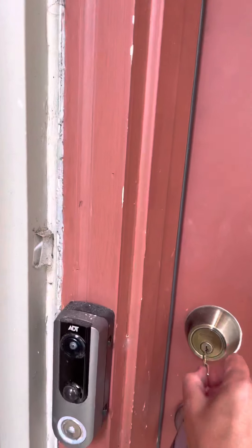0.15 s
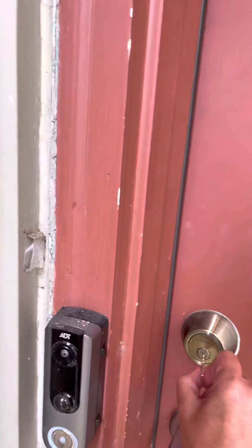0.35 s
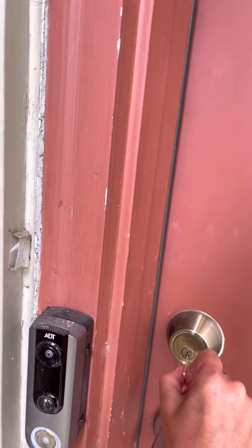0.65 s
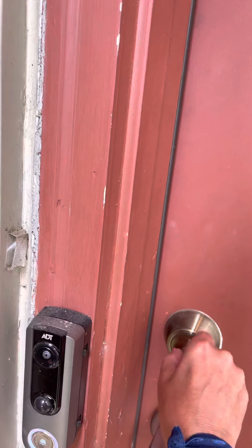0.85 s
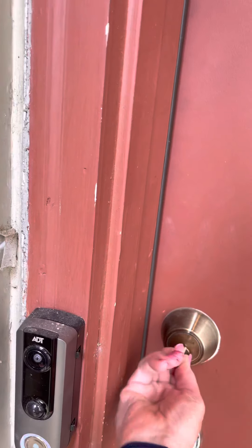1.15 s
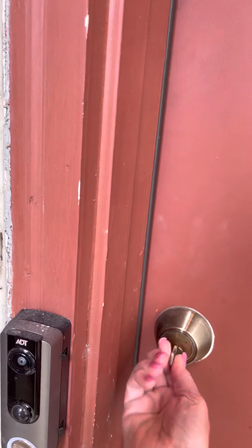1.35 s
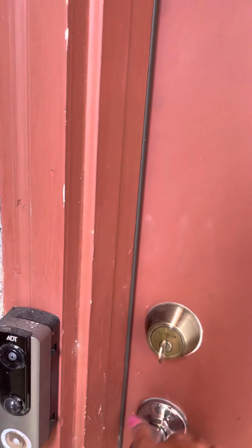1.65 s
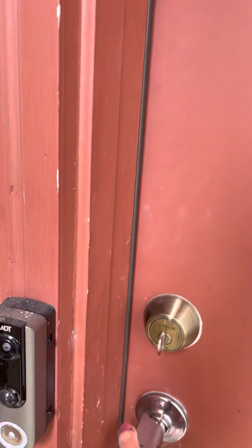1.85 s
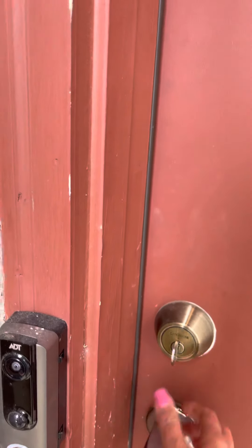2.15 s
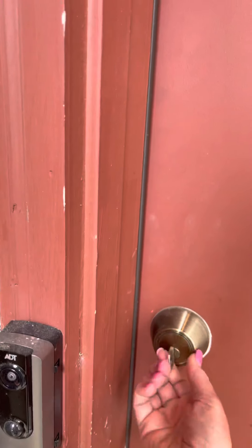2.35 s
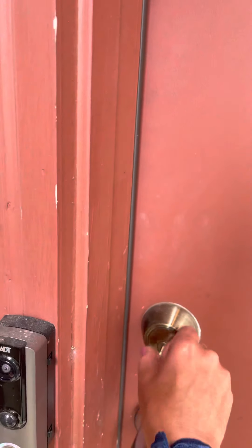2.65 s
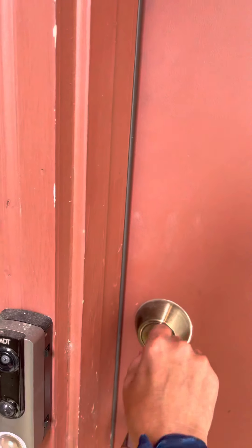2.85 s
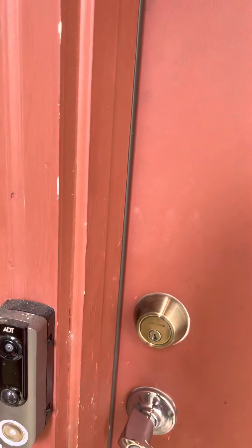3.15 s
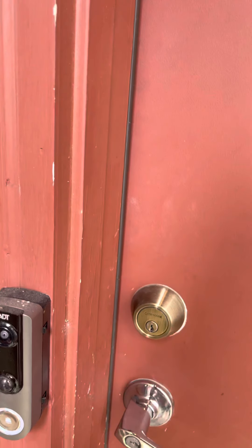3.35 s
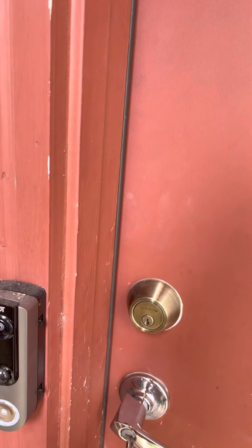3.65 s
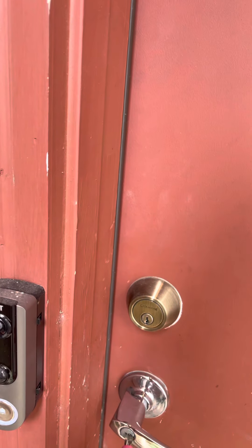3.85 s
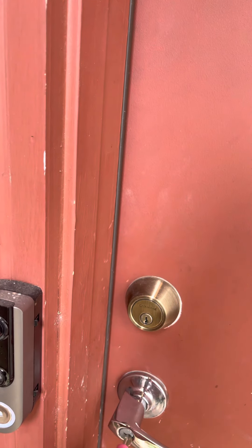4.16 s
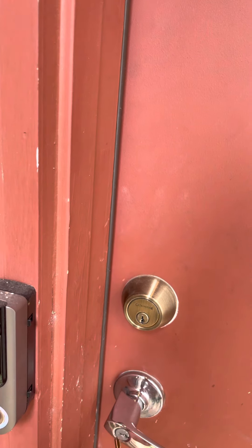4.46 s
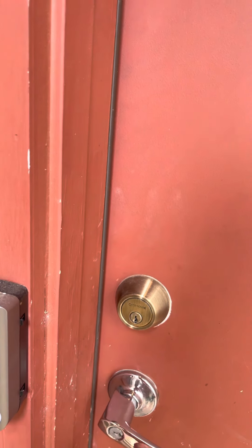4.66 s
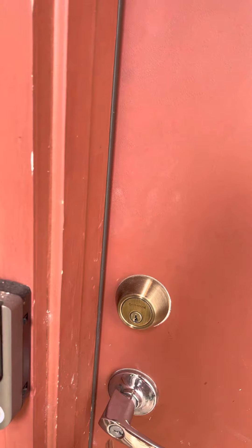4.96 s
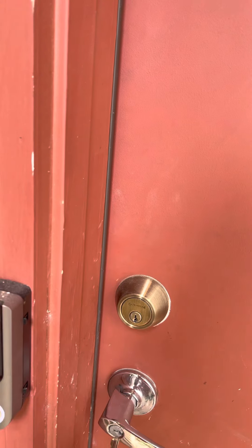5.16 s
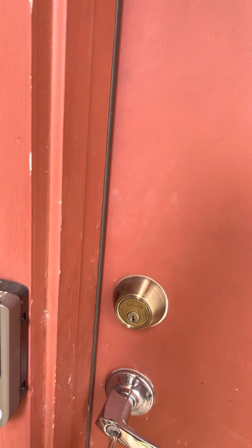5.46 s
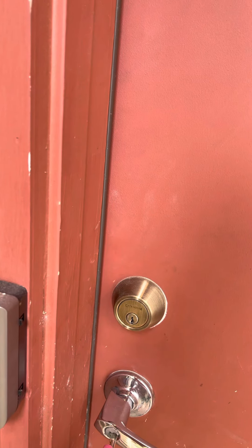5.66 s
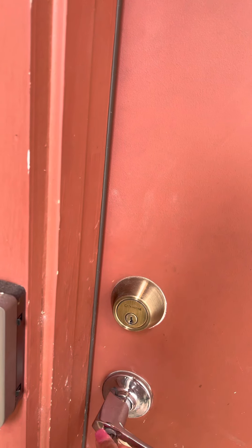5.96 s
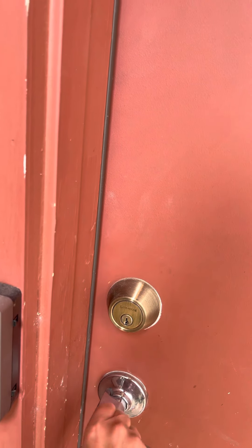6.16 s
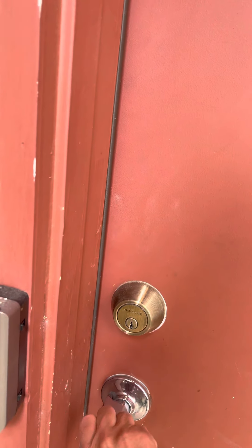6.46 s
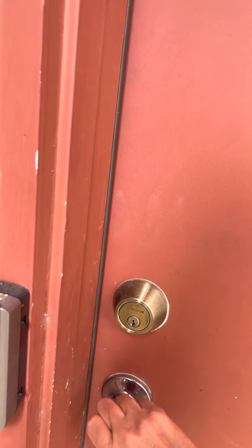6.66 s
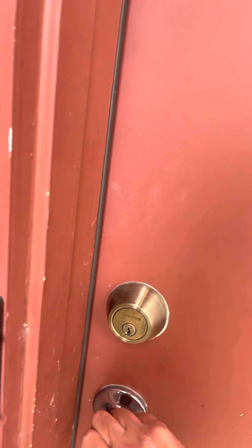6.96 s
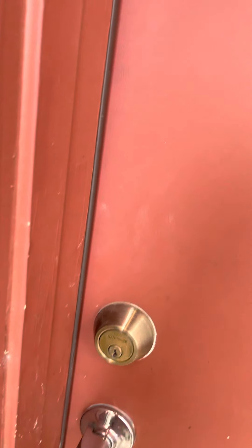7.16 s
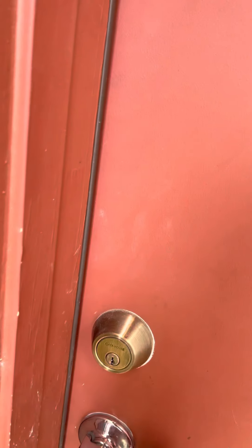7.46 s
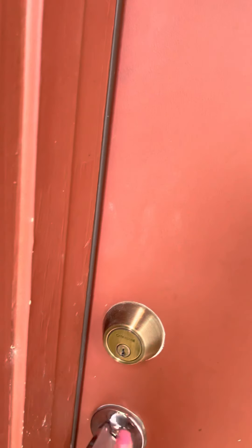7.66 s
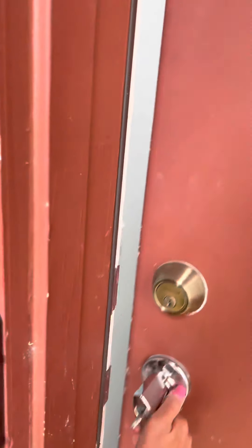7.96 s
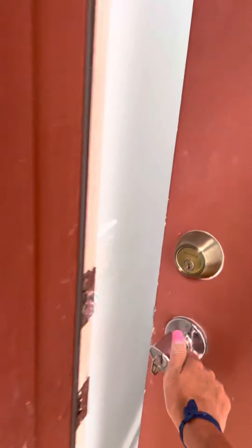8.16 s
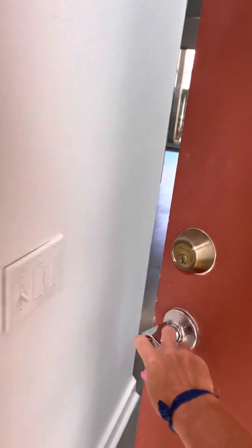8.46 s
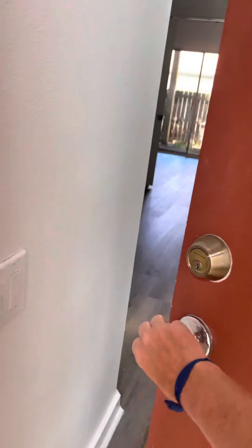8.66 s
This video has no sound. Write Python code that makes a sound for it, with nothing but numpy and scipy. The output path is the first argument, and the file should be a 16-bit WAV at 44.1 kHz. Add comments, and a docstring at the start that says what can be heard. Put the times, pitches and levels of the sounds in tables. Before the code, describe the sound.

Bright, dry clicks and scratchy strokes of small metal parts, very near, with soft panel thuds beneath. Busy key work in the lock comes first, then sparse faint ticks, then firmer handle knocks and a strong latch clack as the door swings open, with brief faint hinge squeaks. Behind it all lie steady bass-heavy street noise and a wavering distant engine hum; a thin high whine appears late. Stereo, close, outside an entrance.

```python
"""First a short metal scrape and a click, close at a wooden door, over street rumble and a far engine drone.
A hand turns a key in a deadbolt, draws it out, unlocks the knob below and pushes the door open.
Clicks and scrapes are noise that rings the lock; thumps shake the panel modes; faint squeaks are slipping tones.
Street and drone are shaped noise and wavering tones. Two close microphone ports hear the treble out of step."""
import sys
import numpy as np
from scipy import signal
from scipy.fft import rfft, irfft, next_fast_len
from scipy.io import wavfile
from scipy.ndimage import uniform_filter1d

SR = 44100
rng = np.random.default_rng(int(sys.argv[2]) if len(sys.argv) > 2 else 0)


def waveform_to_disk(signal):
    """Save audio, clipped to [-1, 1], as 16-bit WAV at the path in sys.argv[1]."""
    frames = np.transpose(np.atleast_2d(signal))
    scaled = np.clip(frames, -1, 1) * 32767
    samples = np.round(scaled).astype(np.int16)
    wavfile.write(sys.argv[1], SR, samples)


N = 388521


def gain_of(db):
    """Turns decibels into an amplitude factor."""
    return 10 ** (np.asarray(db) / 20)


def evened(x):
    """Brings each row to an rms of 1."""
    return x / np.sqrt(np.mean(x ** 2, -1, keepdims=True) + 1e-20)


def read(points, hz):
    """Reads a curve of (f/Hz, value) points along a logarithmic frequency axis."""
    f, value = np.transpose(points)
    return np.interp(np.log(hz + 1), np.log(f + 1), value)


def smoothed_twice(x, size):
    """Runs a moving average twice along the last axis."""
    return uniform_filter1d(uniform_filter1d(x, size=size), size=size)


def add(mix, start_s, sound):
    """Lays a sound into the mix at its start time, cut at the end of the scene."""
    part = mix[:, round(start_s * SR):][:, :sound.shape[1]]
    part += sound[:, :part.shape[1]]


def resonate(x, hz, width_hz):
    """Shifts the curve hz down to zero, smooths, and shifts back: a resonance of gain 1."""
    turn = np.exp(2j * np.pi * np.cumsum(hz * np.ones(x.shape[-1])) / SR)
    pole = np.exp(-np.pi * width_hz / SR)
    smooth = signal.lfilter([1 - pole], [1, -pole], x / turn + 1e-18)
    return 2 * (turn * smooth).real


def halo_around(noise, hz, width_hz):
    """Narrows noise to a fuzzy halo around hz by two resonances in a row, at rms 1."""
    return evened(resonate(resonate(noise, hz, width_hz), hz, width_hz))


# Spectrum of the street at the door; only its shape counts: f/Hz, level/dB (per Hz)
STREET_SPECTRUM = [(15, -84), (33, -29.5), (43, -6), (102, -5), (125, -12.5), (185, -14), (281, -26),
                   (330, -31.5), (1200, -35.5), (1520, -47), (2250, -47), (8000, -67), (11000, -65),
                   (13000, -100.5)]


def street():
    """Street rumble: random short-time spectra whose level drifts in patches of time and frequency."""
    level_db, patch_db = -33.5, 1.35  # overall rms; spread of the patches
    frames, hz = N // 512 + 5, np.fft.rfftfreq(2048, 1 / SR)
    a, b, c, d, patches = rng.standard_normal((frames, 1025, 5)).T
    patches = uniform_filter1d(patches, 20, 0)  # along frequency
    patches = evened(uniform_filter1d(patches, 12, 1))  # along time
    spectrum_db = read(STREET_SPECTRUM, hz)[:, None] + patch_db * patches
    spectra = np.array([a + 1j * b, c + 1j * d]) * gain_of(spectrum_db)
    sound = signal.istft(spectra, nperseg=2048, noverlap=1536)[1][:, :N]
    return gain_of(level_db) * evened(sound)


# Orders of the far engine, one list each, silent outside its times:
# t/s, f/Hz, level/dB (before the shares of tone and halo)
ENGINE_ORDERS = [
    [(0, 54.82, -35), (8.81, 56.38, -33.5)],
    [(0, 102.3, -31.5), (1.7, 106.9, -33.5), (1.95, 100.2, -30), (5.4, 97.38, -38.5), (5.7, 88.95, -34.5),
     (8.1, 89.8, -32), (8.3, 103.1, -42), (8.81, 106.4, -28)],
    [(5.3, 180.4, -43.5), (7.5, 176.6, -43.5)],
]


def drone(rows, steady=.65, width_hz=8.0):
    """One engine order or whistle: a gliding tone with a wavering halo of narrow noise."""
    s, hz, db = np.transpose(rows)
    t = np.arange(N) / SR
    hz = np.interp(t, s, hz)
    halo = halo_around(rng.standard_normal(N), hz, width_hz)
    tone = np.sqrt(2) * np.sin(2 * np.pi * np.cumsum(hz) / SR)
    level = gain_of(np.interp(t, s, db, -120, -120))
    return level * (steady * tone + 0.5 * halo)


# Colour of small metal parts as the close microphone hears them, with its peak near 11 kHz;
# each band is levelled afterwards: f/Hz, level/dB (per Hz)
METAL_COLOUR = [(500, -7.5), (1000, -12), (2500, -6.5), (4000, -5.5), (6500, -4.5), (8500, -8.5),
                (10000, 0.5), (11000, 1), (12000, -10), (12800, -21), (16000, -46)]


def metal_bands(x, body_db, fizz_db):
    """Colours x as small metal parts sound through the close microphone; weighs body, middle and fizz apart."""
    size = next_fast_len(x.shape[1] + 512)
    hz = np.fft.rfftfreq(size, 1 / SR)
    spectrum = rfft(x, size) * gain_of(read(METAL_COLOUR, hz))
    above_3k, above_9k = [1 / (1 + (edge / (hz + 1)) ** 12) for edge in (3000, 9000)]
    shares = (1 - above_3k, above_3k - above_9k, above_9k)
    bands = [irfft(spectrum * share, size)[:, :x.shape[1]] for share in shares]
    return sum(gain_of(db) * evened(band) for db, band in zip((body_db, 0, fizz_db), bands))


# Ringing modes of the lock: f/Hz, level/dB (relative),
# decay t/s (to fall 90 dB under a click, 120 dB under a scrape)
LOCK_MODES = [(820, -3, .1), (1050, -3, .07), (1290, 0, .1), (1500, 0, .08), (1880, -1, .045),
              (2370, -6, .05), (2800, -5, .05), (3500, -3, .06), (3950, -1, .06), (5500, -5, .05),
              (6500, -3, .05), (10800, -5, .07), (11090, -4, .07)]


def catch_ring(catches):
    """Each mode of the lock is rung briefly by a chance 40 % of the catches."""
    t = np.arange(round(.05 * SR)) / SR
    ring = 0
    for hz, db, decay_s in LOCK_MODES:
        mode = gain_of(db - 120 * t / decay_s) * np.exp(2j * np.pi * hz * t)
        struck = catches * (rng.random(len(catches)) < .4)
        ring = ring + signal.oaconvolve(struck, mode)[:len(catches)]
    return evened(np.array([ring.imag, ring.real]))


# Strokes of metal sliding on metal, close: start t/s, rise t/s, fall t/s,
# top level/dB (3-9 kHz), fizz level/dB re that, lock body level/dB re that
SCRAPES = [(0, 0.00038, 0.095, -36, 4, 3.5), (0.696, 0.082, 0.084, -29.5, -3, 1.5),
           (0.819, 0.051, 0.39, -56, -2.5, 5), (1.3, 0.25, .03, -63, -6, 6),
           (2.378, 0.024, 1, -64, -6, 10.5), (2.761, 0.052, 0.23, -50.5, -9.5, 11),
           (4.049, 0.14, 0.13, -58.5, -13.5, -12.5), (5.675, 0.099, 0.099, -43, 8, -2),
           (5.85, 0.19, 0.16, -57, -5, -1), (6.658, 0.071, 0.21, -48.5, -6, 4.5),
           (6.799, 0.1, 0.25, -52.5, 3.5, 1.5), (7.559, 0.058, 0.27, -42, -0.5, -0.5),
           (7.7, 0.056, 0.31, -38, -1.5, 2.5), (7.85, 0.32, 0.23, -52.5, -0.5, 6),
           (8.2, 0.063, 0.8, -58.5, -2, 1)]


def scrape(rise, fall, top_db, fizz_db, body_db):
    """Dense tiny catches, a few of them larger, blur into a rustle that swells and fades with the stroke."""
    ends_db, bend = -23, 1.01  # level at either end of a stroke re its top; above 1 = a rounded top
    catches_per_s, ring_db = 450, -8.5  # ring of the lock re the rustle
    t = np.arange(round(.8 * SR)) / SR
    away = np.where(t < rise, 1 - t / rise, (t - rise) / fall)  # 0 at the top, 1 at either end
    stroke = gain_of(top_db + ends_db * away ** bend)
    sizes = gain_of(3.0 * np.minimum(rng.exponential(1, len(t)), 2.5))
    catches = sizes * (rng.random(len(t)) < catches_per_s / SR)
    blurred = signal.lfilter([1], [1, -np.exp(-1 / (.002 * SR))], catches)  # each fades over 2 ms
    grain = .8 + uniform_filter1d(blurred, size=20)
    rustle = rng.standard_normal((2, len(t))) * evened(grain)
    rasp = rustle + gain_of(ring_db) * catch_ring(catches)
    return stroke * metal_bands(rasp, body_db, fizz_db)


def tinted(x):
    """Lays chance hills and valleys over the spectrum: each contact sounds from another spot."""
    spread_db, width_hz = 3.0, 600
    size = x.shape[1]
    hills = evened(smoothed_twice(rng.standard_normal(size // 2 + 1), width_hz * size // SR))
    return irfft(rfft(x) * gain_of(spread_db * hills), size)


# Clicks of key, pins and latch, close: t/s, rms level/dB (3-9 kHz),
# lock body level/dB re that, fizz level/dB re that, strongest ring f/Hz
CLICKS = [(0.004, -52, 6, 2, 820), (0.185, -49.5, 0.5, 10.5, 2800), (0.364, -66.5, -24, 12.5, 1290),
          (0.4557, -43, 1, -8.5, 1640), (0.5026, -51.5, 5.5, 7, 1560), (0.7674, -37.5, -2, -3, 1260),
          (0.7996, -49.5, 8, -14, 1500), (0.95, -58, 6.5, -5, 1900), (1.0119, -54, 0.5, -6, 2340),
          (1.3605, -66, 11.5, -11.5, 2450), (1.463, -63, 4.5, -32, 1500), (1.513, -52.5, -2.5, 5, 4030),
          (1.71, -55, -5, -0.5, 4450), (1.7872, -66, 5, -2, 1263), (2.1365, -44.5, -45, -1.5, 6500),
          (2.32, -64, -2, 12.5, 1290), (2.3424, -39.5, -2, -2.5, 4100), (2.4009, -48, -2.5, 1, 5560),
          (2.483, -70, 11.5, 1, 3500), (2.57, -75.5, 15, -12, 5400), (2.6187, -57.5, 8, -11, 1350),
          (2.699, -70, -20, -1, 6504), (2.715, -62.5, 11, -25, 1300), (2.7926, -48.5, 2, -3, 1700),
          (2.823, -53.5, 9.5, 2.5, 1506), (2.8572, -49.5, -16, 1.5, 1540), (2.8981, -42, 4.5, 14, 1330),
          (3.682, -80.5, -9, 9, 6500), (4.0162, -67, 6, 5, 1290), (4.335, -61.5, -6, -9, 2376),
          (4.43, -73, 9, -21.5, 2370), (4.8014, -77, -13, 12.5, 1290), (4.933, -60.5, -9, 8.5, 6500),
          (5.456, -75.5, -10, -3.5, 6500), (5.4764, -64.5, 1.5, 15.5, 1260), (5.7094, -64, -23, 17.5, 1290),
          (6.081, -64, 3.5, 7, 1880), (6.219, -68, -21.5, -2.5, 6500), (6.5333, -71, 12, -10, 1400),
          (6.672, -61.5, -23, 5, 2800), (6.7263, -44, -9, -3.5, 3600), (6.8582, -58, 9.5, -4, 1540),
          (6.885, -46, -1, 3, 6500), (7.218, -67.5, 2.5, -3, 1500), (7.6022, -51, -30, 6.5, 6545),
          (7.644, -55.5, -0.5, 5, 1484), (7.7489, -42.5, -5, 2, 2760), (7.7724, -49.5, 13, -17, 1880),
          (7.8256, -49, 3, 4, 1049), (7.889, -49.5, 6.5, -4, 1014), (8.09, -43, -0.5, -4, 1160),
          (8.1527, -57, -3, 0, 1298), (8.5218, -59.5, -33, -9, 6400), (8.75, -65, 6.5, 5, 2400)]


def click(level_rms_db, body_db, fizz_db, ring_hz):
    """A crack of a few milliseconds, the ring of the lock, and a noisy tail from the door recess."""
    t = np.arange(round(.22 * SR)) / SR
    hz, db, decay_s = np.transpose(LOCK_MODES)[:, :, None]
    chance = rng.standard_normal((3, len(LOCK_MODES), 1))
    near_db = 9.0 * np.exp(-(np.log(hz / ring_hz) / .15) ** 2)  # the part that is struck rings most
    level_db = db + near_db + 2.5 * chance[0]
    sagging_t = t * (1 - 1.2 * t)  # the ring sags as the parts settle
    turn = 2 * np.pi * hz * (1 + 0.03 * chance[1]) * sagging_t + 9 * chance[2]
    modes = (gain_of(level_db - 90 * t / decay_s) * np.exp(1j * turn)).sum(0)

    unevenness = evened(uniform_filter1d(rng.standard_normal(len(t)), size=120))
    clatter = gain_of(4.0 * unevenness)  # loose parts rebound unevenly
    crack = np.exp(-((t - .0015) / 0.0018) ** 2)
    rattle = clatter * gain_of(-7.5 - 60 * t / 0.14)
    tail = gain_of(-12.0 - 60 * t / 0.28)

    shake = rng.standard_normal(len(t)) * (crack + 2 * rattle)
    # crack and rebounds keep striking the modes
    ring = signal.oaconvolve(shake / np.linalg.norm(shake), modes)[:len(t)]
    noise = tinted(rng.standard_normal((2, len(t)))) * (crack + rattle + tail)
    blow = noise + gain_of(-10.0) * np.array([ring.imag, ring.real])
    blow = blow * np.minimum(t / 0.0012, 1) * (1 - t / t[-1])
    return gain_of(level_rms_db) * metal_bands(blow, body_db, fizz_db)


# Broad low modes of the wooden panel: f/Hz, level/dB (relative, before the struck spot is raised)
PANEL_MODES = [(260, 3), (310, 7), (440, 6), (520, 3), (640, 5), (770, 1)]
# Blows passed into the door panel: t/s, peak level/dB of the knock,
# boom level/dB re that (before its fade), decay t/s (60 dB, of the push), strongest mode f/Hz
THUMPS = [(0.452, -31.5, -2, 0.086, 452), (1.713, -30.5, 1, 0.11, 256), (1.787, -25, 1, 0.13, 294),
          (2.086, -27, -1.5, 0.24, 278), (2.396, -27, 3, 0.08, 454), (2.801, -28.5, 3, 0.14, 530),
          (2.855, -29, 16, 0.082, 303), (4.021, -28.5, -15, 0.12, 425.3), (5.754, -27, 0.5, 0.19, 395),
          (5.796, -28.5, 10.5, 0.087, 308), (6.034, -24.5, -3, 0.17, 414), (6.724, -14.5, 1.5, 0.12, 590),
          (6.859, -18, -3.5, 0.19, 544), (7.595, -21, 1, 0.23, 360), (7.645, -20.5, -10, 0.13, 468),
          (7.687, -22.5, 2.5, 0.21, 440), (7.75, -15, 0.5, 0.049, 308), (7.773, -11, -2.5, 0.049, 560),
          (7.837, -22, 4.5, 0.04, 785), (7.89, -29.5, -16, 0.1, 428), (8.115, -27.5, -1, 0.21, 269),
          (8.191, -22.5, -9, 0.13, 313), (8.265, -32, -9, 0.087, 655), (8.745, -36, -9, 0.05, 640)]


def thump(peak_db, boom_db, t60, mode_hz):
    """A push shakes the broad low modes of the panel, most those of the spot that is struck."""
    boom_hz = 136
    t = np.arange(2 ** 14) / SR
    f = np.fft.rfftfreq(len(t), 1 / SR)
    swell = gain_of(-60 * t / t60) * np.minimum(t / (0.091 * t60), 1)
    onset = 2.1 * np.exp(-t / 0.0019)
    push = rng.standard_normal((2, len(t))) * (swell + onset)
    panel = 0
    for hz, db in PANEL_MODES:
        near_db = 8.4 * np.exp(-(np.log(hz / mode_hz) / 0.22) ** 2)
        ratio = f / hz
        panel = panel + gain_of(db + near_db) / (1 - ratio ** 2 + .13j * ratio) * ratio
    softness = (1 + 1j * f * t60 / 23.0) ** 2  # longer blows are duller
    knock = irfft(rfft(push) * panel / softness)
    knock = knock / abs(knock).max(1, keepdims=True)
    boom = gain_of(boom_db - 60 * t / (1.94 * t60)) * np.sin(2 * np.pi * boom_hz * t)
    return gain_of(peak_db) * (knock + boom * np.minimum(t / 0.01, 1))


# Faint squeaks of hinge and handle: start t/s, end t/s, f/Hz (at the start, before slipping),
# level/dB (before the shares of tone and halo)
SQUEAKS = [(6.16, 6.40, 890, -56), (8.26, 8.305, 1335, -48), (8.36, 8.50, 1108, -56.5),
           (8.57, 8.64, 810, -52), (8.575, 8.625, 1620, -54), (8.63, 8.85, 528, -53)]


def squeak(length, hz, db):
    """An unevenly slipping, sinking tone with a fuzzy halo, fading in and out."""
    noise, t = rng.standard_normal((2, SR // 2)), np.arange(SR // 2) / SR
    halo = halo_around(noise, hz, width_hz=14)
    slip = evened(smoothed_twice(noise[0], 900))
    turn = 2 * np.pi * np.cumsum(hz * (1 - .06 * t + .008 * slip)) / SR
    tone = np.sqrt(2) * gain_of(2.5 * slip[::-1]) * np.sin(turn)
    fade = np.clip(4 * np.minimum(t, length - t) / length, 0, 1)
    return gain_of(db) * (.75 * tone + .6 * halo) * fade


# A thin high tone, perhaps an insect: t/s, f/Hz, level/dB (before the shares of tone and halo)
WHISTLE = [(6.25, 7320, -71.5), (6.37, 7370, -63), (6.8, 7285, -59), (7.25, 7320, -54.5), (7.6, 7310, -61)]


def whistle():
    """A thin high tone, mostly a halo of narrow noise with little steady tone."""
    return drone(WHISTLE, steady=.2, width_hz=43.0)


def scene():
    """Channel one reaches both ports alike, channel two is the scattered part that differs between them."""
    mix = street() + sum(drone(rows) for rows in ENGINE_ORDERS)  # each tone enters both channels
    for s, *row in SCRAPES:
        add(mix, s, scrape(*row))
    for s, *row in CLICKS:
        add(mix, s, click(*row))
    for s, *row in THUMPS:
        add(mix, s, thump(*row))
    for s, end, *row in SQUEAKS:
        add(mix, s, squeak(end - s, *row))
    return mix + whistle()


# Scattered sound at the two ports: f/Hz, level/dB (gain of the unlike channel)
SCATTER = [(60, -34), (200, -25), (380, -12), (650, -4), (1900, -8), (3000, 0), (5000, -2), (6000, -10),
           (8000, -14), (9300, -28), (13000, -20), (15500, -6)]
# Phase by which the left port leads the right: f/Hz, lead/rad
LEFT_LEAD = [(0, 0), (1500, -.2), (2100, .4), (3300, -.6), (4800, -2.1), (5900, 0), (9300, 3.14),
             (12700, 6.28), (15300, 9.2)]


def record(dry):
    """The port pair: alike plus and minus unlike sound, the left leading or lagging by pitch; then the band limit."""
    size = next_fast_len(N + 4096)
    hz = np.fft.rfftfreq(size, 1 / SR)
    alike, unlike = rfft(dry, size)
    alike = alike / np.sqrt(1 + (40 / (hz + 1)) ** 8)  # the microphone drops the deepest bass
    unlike = unlike * gain_of(read(SCATTER, hz))
    half_lead = np.exp(.5j * np.interp(hz, *np.transpose(LEFT_LEAD)))
    left, right = (alike + unlike) * half_lead, (alike - unlike) / half_lead
    ports = irfft(np.array([left, right]), size)[:, :N]
    band_limit = signal.firwin(511, 16000, window=("kaiser", 9), fs=SR)  # low-pass edge in Hz
    return signal.oaconvolve(ports, band_limit[None], "same")


dry = scene()
out = record(dry)
waveform_to_disk(out)
```